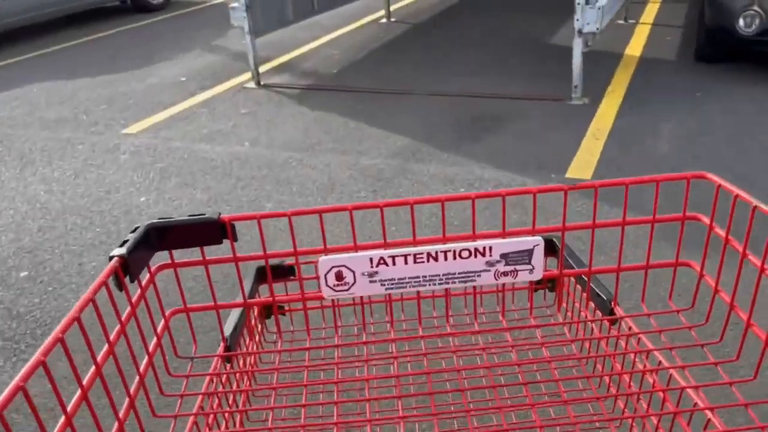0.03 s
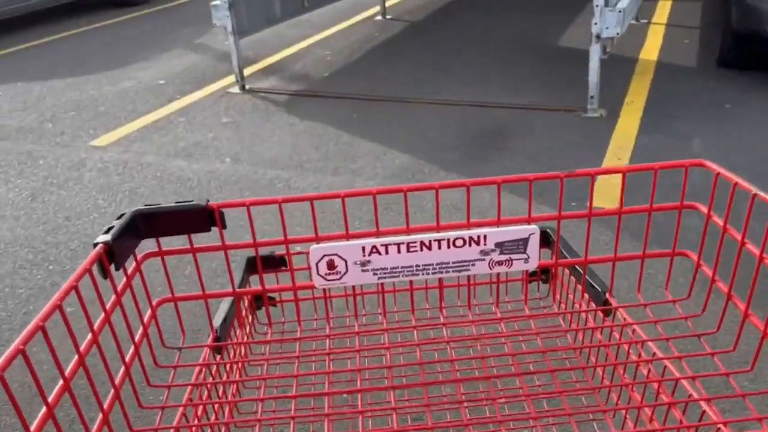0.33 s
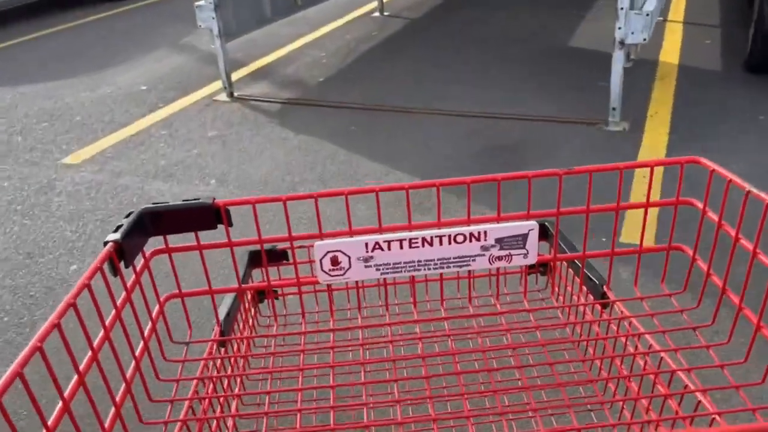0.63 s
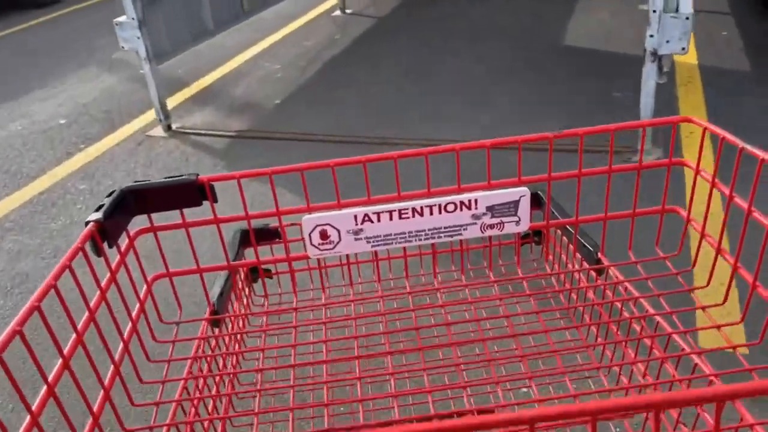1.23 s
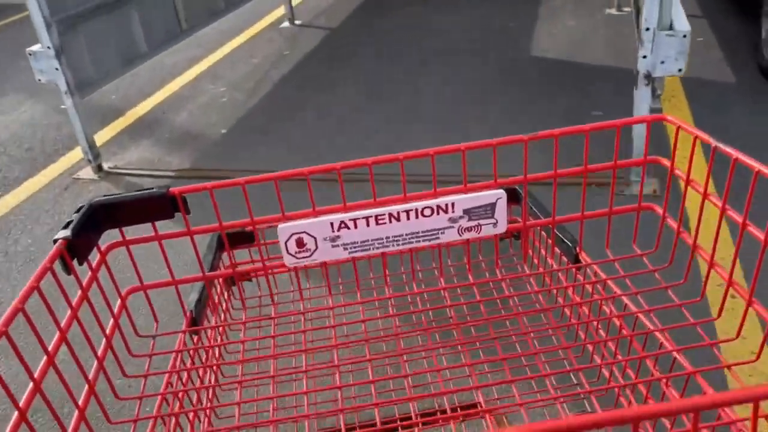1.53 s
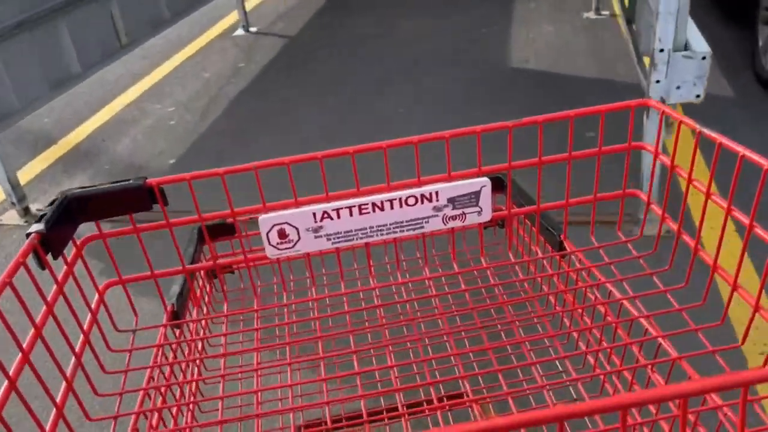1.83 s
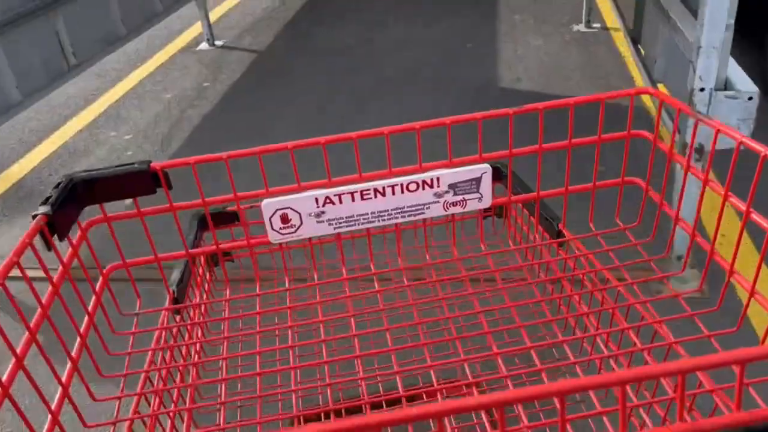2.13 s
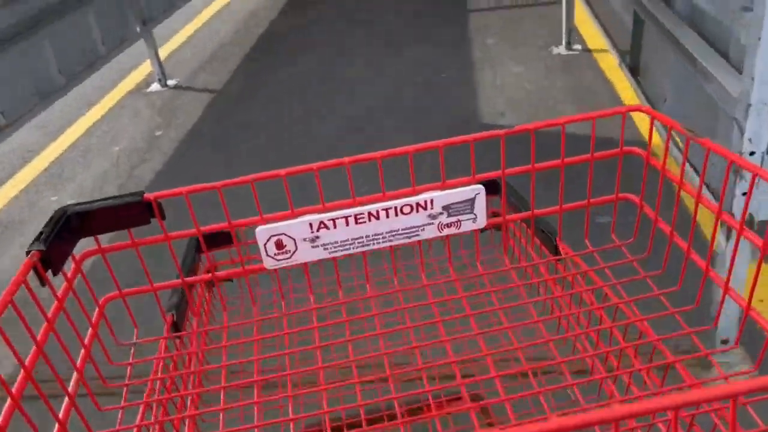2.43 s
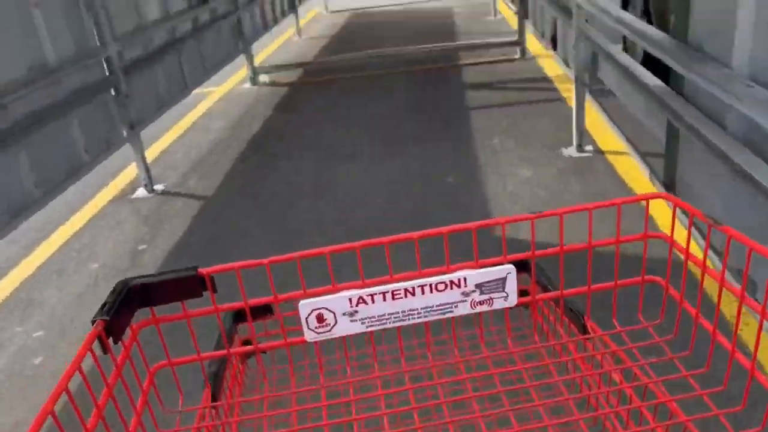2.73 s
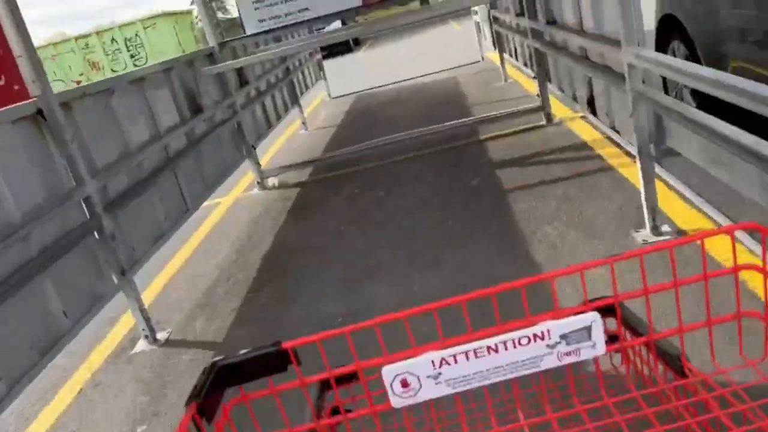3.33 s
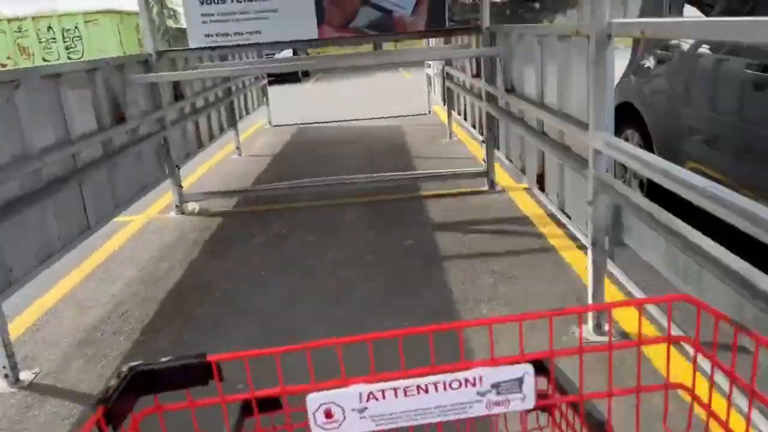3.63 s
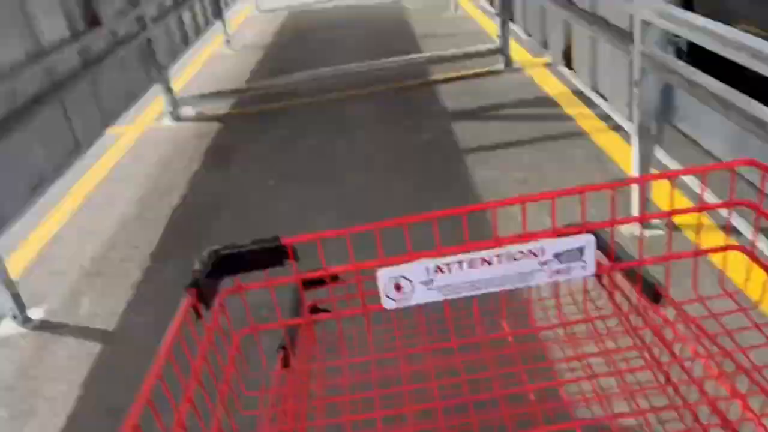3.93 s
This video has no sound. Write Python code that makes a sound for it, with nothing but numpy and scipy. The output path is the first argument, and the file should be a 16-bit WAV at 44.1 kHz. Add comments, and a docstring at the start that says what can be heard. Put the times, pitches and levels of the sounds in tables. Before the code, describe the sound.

A wire shopping cart rattles over rough asphalt, heard from its handle. Throughout, the wheels crunch and rumble, loose casters clack and the basket chatters, with a sharper jingle around 1.2 seconds. A stronger thud comes at 2.3 seconds. From about 2.8 to 3.2 seconds the basket clatters loudly into a corral, its wires ringing. It eases briefly, then clatters again from 3.6 to 4 seconds.

```python
"""A wire shopping cart rattles over rough asphalt and into a cart corral, heard from its handle.
Grit crackles under the wheels, bumps thud through the frame and loose casters clack in their forks.
Each jolt sets the basket chattering with tiny impacts, each ringing the metal for a moment.
At the corral the basket clatters loudly and its wires ring on."""
import sys
import numpy as np
from scipy import signal
from scipy.fft import rfft, irfft
from scipy.io import wavfile

SR = 44100
rng = np.random.default_rng(int(sys.argv[2]) if len(sys.argv) > 2 else 0)


def to_wav(s):
    """Save 16-bit WAV."""
    ch = np.atleast_2d(s).T  # columns
    pcm = np.round(np.clip(ch, -1, 1) * 32767)  # PCM
    wavfile.write(sys.argv[1], SR, pcm.astype(np.int16))


N = 176400
TIME, FREQS = np.arange(N) / SR, np.fft.rfftfreq(N, 1 / SR)
QUADRATURE = np.array([[0], [np.pi / 2]])  # two channels, a quarter cycle apart


def amp(db):
    """Decibels to gain."""
    return 10 ** (np.asarray(db) / 20)

def unit(x):
    """Scales to rms 1."""
    return x / np.sqrt(np.mean(x ** 2) + 1e-20)

def decay(t, t60):
    """An envelope that falls 60 dB in t60 seconds."""
    return np.exp(-np.log(1000) * t / t60)

def read(points, hz):
    """Reads a curve on a log-frequency axis."""
    freqs, values = np.transpose(points)
    return np.interp(np.log(hz + 1), np.log(freqs + 1), values)

def fader(points):
    """A dB curve as gain over time."""
    return amp(np.interp(TIME, *np.transpose(points)))

def add(mix, start_s, sound):
    """Mixes a stereo sound in at start_s."""
    part = mix[:, max(round(start_s * SR), 0):][:, :sound.shape[1]]
    part += sound[:, :part.shape[1]]

def colour(x, eq, size=8192):
    """Minimum-phase EQ: nothing rings ahead of an attack."""
    log_gain = np.log(amp(read(eq, abs(np.fft.fftfreq(size, 1 / SR)))))
    response = np.exp(np.conj(signal.hilbert(log_gain)))
    taps = np.fft.ifft(response).real[:size // 2]
    return signal.fftconvolve(x, taps[None], axes=1)[:, :x.shape[1]]

def ring(t60, tail_db=-17.5, tail_t60=0.15, size=8192):
    """Dense metal modes after one contact: a quick decay, then the frame's faint tail."""
    t = TIME[:size]
    return rng.standard_normal((2, size)) * (decay(t, t60) + amp(tail_db) * decay(t, tail_t60))

def contacts(per_s, spread_db):
    """Random tiny impacts of uneven strength."""
    strength = amp(spread_db * np.minimum(rng.exponential(1, N), 4))
    return unit(strength * rng.choice([-1, 1], N) * (rng.random(N) < per_s / SR))

def excite(force, response):
    """Plays impacts through a resonance scaled to unit energy."""
    response = response / np.linalg.norm(response, axis=1, keepdims=True)
    return signal.oaconvolve(force[None], response, axes=1)[:, :N]

def rattle(force, eq, t60, spots=10):
    """Impacts land on several spots of the cart, each with its own ring."""
    spot = rng.integers(0, spots, N)
    return sum(excite(force * (spot == k), colour(ring(t60), eq)) for k in range(spots))


# Fader moves for the grit and the low rumble: time_s, level_db
GRIT_FADER = [(0, -36), (.18, -40.5), (.5, -35.5), (.72, -38.5), (1.0, -38), (1.1, -36), (1.22, -31),
              (1.4, -35), (1.65, -33.5), (1.78, -38.5), (2.05, -34), (2.26, -35.5), (2.38, -39),
              (2.55, -36), (2.72, -38), (3.15, -32.5), (3.42, -37.5), (3.55, -35.5), (3.75, -33),
              (4, -31.5)]
RUMBLE_FADER = [(0, -33), (.17, -40), (.4, -37), (.56, -40.5), (.76, -42), (1.0, -36), (1.22, -38),
                (1.35, -50.5), (1.62, -31.5), (1.76, -40.5), (2.05, -51), (2.25, -42.5), (2.65, -36.5),
                (3.0, -39), (3.1, -48), (3.35, -43), (3.5, -52), (3.75, -47), (4, -50)]
# Crunchy mids of the grit, bass weight of the rumble: freq_hz, gain_db
GRIT_EQ = [(60, -3), (200, -18.5), (340, -5), (470, 2.5), (590, -3), (760, 5), (1100, 1), (1700, -5),
           (2700, -6.5), (4700, -11), (6500, -15), (7600, -13.5), (10000, -19.5), (14500, -27.5)]
RUMBLE_EQ = [(18, -66), (32, -8.5), (55, 4.5), (75, -0.5), (110, 1), (170, -4.5), (280, -8), (450, -14),
             (900, -33.5), (8000, -51)]
def wheels():
    """The rolling bed: hard wheels crunch over grit and rumble on coarse asphalt."""
    grit = rattle(contacts(per_s=1300, spread_db=2.5) * fader(GRIT_FADER), GRIT_EQ, t60=0.025)
    rumble = rattle(contacts(per_s=320, spread_db=2) * fader(RUMBLE_FADER), RUMBLE_EQ, t60=0.035)
    return grit + rumble

# Thuds under the wheels: start_s, level_db, pitch_hz
BUMP_HITS = [(0.047, -29, 66.4), (0.337, -27.5, 152), (.37, -32.5, 128), (.432, -30.5, 61),
             (0.448, -32, 70.4), (0.694, -29.5, 80), (.808, -26, 60.5), (0.821, -30, 168),
             (1.005, -26, 242), (1.158, -24, 149), (1.576, -25.5, 188), (1.615, -31.5, 132),
             (1.69, -30, 174), (1.91, -29, 95), (1.929, -30.5, 194), (2.275, -16.5, 257),
             (2.292, -24.5, 272), (2.304, -31, 110), (2.477, -24, 99), (2.592, -31.5, 96.5),
             (2.68, -29.5, 106), (2.703, -27.5, 165), (2.781, -29.5, 171), (2.842, -28, 89),
             (2.996, -31, 172), (3.331, -34, 79), (3.69, -36.5, 151)]
def bumps(rise_cycles=0.49, roughness=0.73, size=8192):
    """Each bump rocks the frame for a few cycles, with a scuff of low noise."""
    out, t = np.zeros((2, N)), TIME[:size]
    for start_s, level_db, pitch_hz in BUMP_HITS:
        swell = t * pitch_hz / rise_cycles
        envelope = swell * np.exp(1 - swell)
        sway = np.sin(2 * np.pi * pitch_hz * t + QUADRATURE)
        scuff = unit(colour(rng.standard_normal((2, size)), RUMBLE_EQ))
        add(out, start_s, amp(level_db) * envelope * (sway + roughness * scuff))
    return out

# Tiny ticks of grit and wire ends, and hard snaps of wire on wire: start_s, attack_db
TICK_HITS = [(.549, -35), (1.173, -33.5), (1.597, -45), (3.117, -27), (3.519, -42), (3.568, -42)]
SNAP_HITS = [(1.173, -31.5), (3.568, -32), (3.630, -27)]
# Bright top of a tick, midrange crack of a snap: freq_hz, gain_db
TICK_EQ = [(1000, -28), (6000, 5), (15000, -9)]
SNAP_EQ = [(150, -13), (600, 9), (1000, 10), (2200, 3), (5000, -6), (7500, -9), (11000, -17), (15000, -21)]
def clicks(hits, eq, t60, attack_samples=256):
    """Single hard contacts, each a short burst of ringing metal."""
    out = np.zeros((2, N))
    for start_s, attack_db in hits:
        click = colour(ring(t60), eq)
        add(out, start_s, amp(attack_db) * click / click[:, :attack_samples].std())
    return out

# Clacks of the casters: start_s, level_db (before trim_db), pitch_hz of the hollow note
CLACK_HITS = [(0.224, -32.5, 760), (.535, -32, 795), (1.128, -30, 1100), (1.175, -25.5, 807),
              (1.204, -23, 520), (1.273, -22, 800), (1.326, -26.5, 1440), (1.447, -25.5, 650),
              (1.528, -32, 467), (1.547, -32, 1240), (1.618, -31, 435), (1.652, -29.5, 430),
              (1.841, -26, 764), (1.931, -24, 720), (1.979, -28, 888), (2.03, -29, 1165),
              (2.088, -20.5, 785), (2.126, -21.5, 710), (2.177, -26, 846), (2.236, -25, 431),
              (2.822, -20, 704), (2.837, -18, 1120), (2.864, -21, 437), (2.916, -15, 476),
              (2.958, -18, 644), (3.008, -24, 447), (3.058, -22.5, 674), (3.071, -24, 403),
              (3.084, -20.5, 760), (3.687, -19.5, 717), (3.731, -19, 960), (3.76, -23.5, 474),
              (3.819, -24.5, 447), (3.866, -18.5, 614), (3.934, -23, 895)]
# Boxy body of the knock: freq_hz, gain_db
CLACK_EQ = [(80, -35.5), (250, -11), (450, 3.5), (590, -4), (760, 0), (930, 2), (1350, -3), (1800, -12),
            (4000, -16), (7000, -27), (15000, -40)]
def casters(trim_db=-11, note_db=-2, rise_s=0.0034, attack_samples=1024):
    """Loose casters knock in their forks; each knock brings out one hollow note of the frame."""
    out = np.zeros((2, N))
    for start_s, level_db, pitch_hz in CLACK_HITS:
        metal = ring(t60=0.037)
        t = TIME[:metal.shape[1]]
        rise = np.minimum(t / rise_s, 1)
        knock = colour(metal * rise, CLACK_EQ)
        knock /= knock[:, :attack_samples].std()
        note = rise * decay(t, t60=0.05) * np.sin(2 * np.pi * pitch_hz * t + QUADRATURE)
        note /= note[:, :attack_samples].std()
        add(out, start_s, amp(level_db + trim_db) * (knock + amp(note_db) * note))
    return out

# Shimmer of the basket wires: pitch_hz, relative_db, t60_s
WIRE_MODES = [(5870, -7, 0.73), (7450, -7, 0.33), (9180, -5, 1.3), (9388, -6.5, 1.8), (10100, -5, 0.56),
              (11030, -7, .3), (11125, -7, 1.3), (13550, -10, 0.77)]
def wires(power, trim_db=-1.5, spread_hz=26, knee_db=-30):
    """Groups of like wires store the energy of hard shaking and ring it out, beating together."""
    out = np.zeros((2, N))
    drive = power * (power / (power + amp(knee_db) ** 2)) ** 2  # hardly any ring below the knee
    for pitch_hz, relative_db, t60 in WIRE_MODES:
        feedback = decay(1 / SR, t60) ** 2  # share of energy left after one sample
        stored = signal.lfilter([1 - feedback], [1, -feedback], drive)
        band = 1 / (1 + (2 * (FREQS - pitch_hz) / spread_hz) ** 2)
        shimmer = irfft(rfft(rng.standard_normal((2, N))) * band, N)
        out += amp(relative_db + trim_db) * np.sqrt(stored) * unit(shimmer)
    return out

# Broad clank of the frame: freq_hz, gain_db
CLANK_EQ = [(60, -61), (200, -12), (330, -5), (460, 0), (580, -6.5), (800, 1), (950, -1.5), (1400, -0.5),
            (1900, -6), (2700, -4), (3800, -4.5), (6000, -9.5), (7600, -13), (9500, -27), (15000, -70)]
def loose_parts(force, parts=14, hold_s=0.008, colour_db=1.6, bands=36):
    """One loose part chatters for a moment, then another, each with its own resonances."""
    out = np.zeros((2, N))
    active = rng.integers(0, parts, N)[(TIME / hold_s).astype(int)]
    band_hz = np.geomspace(200, 15000, bands)
    for k in range(parts):
        part_eq = np.transpose([band_hz, colour_db * rng.standard_normal(bands)])
        part_ring = colour(ring(t60=0.04), part_eq)
        out += excite(force * (active == k), colour(part_ring, CLANK_EQ))
    return out

# Jolts that shake the basket: start_s, clank_db, jingle_db, t60_s
BASKET_JOLTS = [(0.0, -34, -41, 0.62), (0.047, -30, -39, 0.6), (.21, -34.5, -60, 0.22),
                (.44, -51, -46, 0.47), (0.474, -35.5, -41, 0.17), (.548, -36, -39.5, 0.35),
                (0.601, -32.5, -41, 0.22), (0.759, -41, -47.5, 1), (.83, -38.5, -46, 0.34),
                (.92, -40, -45, 0.45), (1.124, -36.5, -47, 0.27), (1.172, -32.5, -43, 0.23),
                (1.231, -29, -30, 0.35), (1.269, -29, -35, 0.24), (1.49, -41, -44, 0.26),
                (1.55, -35, -44, 0.24), (1.585, -37, -35, 0.21), (1.789, -38, -44, 0.26),
                (1.976, -27.5, -37, 0.11), (2.026, -33, -38.5, 0.31), (2.088, -48, -39.5, 0.34),
                (2.177, -35.5, -40.5, 0.21), (2.757, -36.5, -37, 0.49), (2.782, -26, -32, 1),
                (2.823, -33, -31.5, 0.79), (2.86, -25.5, -28.5, 0.89), (2.949, -24, -31, 0.96),
                (2.994, -32.5, -29.5, 0.73), (3.089, -28.5, -30, 0.85), (3.24, -39, -51, 0.23),
                (3.567, -37.5, -39, 0.24), (3.628, -33, -45, 0.47), (3.678, -33, -32, .4),
                (3.695, -29.5, -28, 0.94), (3.716, -26.5, -38, 0.44), (3.837, -25, -26.5, 0.91),
                (3.888, -25, -28, 0.46), (3.92, -43, -35, 0.39), (3.994, -33, -42, .3)]
# Sparkle of the jingling wires: freq_hz, gain_db
JINGLE_EQ = [(500, -55), (3000, -2.5), (6000, 1), (7500, 3.5), (8900, 7), (11000, -0.5), (12500, -0.5),
             (14400, -1), (15200, -19)]
def basket(rise_s=0.00053):
    """Jolts start a dying chatter of loose parts, which clanks, jingles and rings the wires."""
    clank_power, jingle_power = np.zeros((2, N))
    for start_s, clank_db, jingle_db, t60 in BASKET_JOLTS:
        age = np.maximum(TIME - start_s, 0)
        shake = np.minimum(age / rise_s, 1) * decay(age, t60)
        clank_power += (amp(clank_db) * shake) ** 2
        jingle_power += (amp(jingle_db) * shake) ** 2
    on_frame = contacts(per_s=900, spread_db=1) * np.sqrt(clank_power)
    on_wires = contacts(per_s=600, spread_db=1) * np.sqrt(jingle_power)
    return loose_parts(on_frame) + rattle(on_wires, JINGLE_EQ, t60=0.04) + wires(jingle_power)

# How alike left and right sound: freq_hz, coherence (0-1)
STEREO_COHERENCE = [(30, .85), (120, .68), (260, .85), (500, .82), (750, .3), (1550, .2), (1750, .68),
                    (4500, .6), (5400, .45), (6200, .72), (7400, .93), (7900, 1), (8750, 1), (9200, .93),
                    (10500, .8), (12000, .97), (13500, .72), (15000, .85)]
# Phase between the sides: freq_hz, left_lead_rad
STEREO_PHASE = [(30, 0), (200, -.15), (600, -.55), (1200, .2), (1800, .4), (3000, 1.1), (4800, .6),
                (5500, -.9), (6600, -1.3), (7850, -3.14), (8750, -3.14), (11300, -6.2), (12900, -6.5),
                (13200, -7.4), (15000, -9.3)]
# Pan across the spectrum: freq_hz, left_minus_right_db
STEREO_PAN = [(250, 0), (700, -2), (1600, -2), (1800, -1), (3200, 3.5), (4800, 5), (6500, 1), (7800, 0)]
def stereo_image(cart):
    """The cart reaches two spaced microphones, with width, phase and pan varying by frequency."""
    left, independent = rfft(cart)
    coherence = np.clip(read(STEREO_COHERENCE, FREQS), 0, 1)
    right = coherence * left + np.sqrt(1 - coherence ** 2) * independent
    right *= np.exp(-1j * read(STEREO_PHASE, FREQS))
    lean = amp(read(STEREO_PAN, FREQS) / 2)
    return irfft(np.array([left * lean, right / lean]), N)

def scene():
    """The rolling bed under the clattering cart, with snaps and ticks as accents."""
    cart = wheels() + bumps() + casters() + basket()
    snaps = clicks(SNAP_HITS, SNAP_EQ, t60=0.045)
    ticks = clicks(TICK_HITS, TICK_EQ, t60=0.016)
    return stereo_image(cart + snaps + ticks)

def record(dry, low_cut_hz=41, high_cut_hz=14650, brickwall_hz=15725):
    """Rolls off the deepest bass and cuts the top treble steeply."""
    low_cut = signal.butter(3, low_cut_hz, "highpass", fs=SR, output="sos")
    high_cut = signal.cheby1(12, 0.2, high_cut_hz, fs=SR, output="sos")
    brickwall = signal.firwin(511, brickwall_hz, window=("kaiser", 9), fs=SR)
    filtered = signal.sosfilt(np.vstack([low_cut, high_cut]), dry)
    return signal.oaconvolve(filtered, brickwall[None], "same")


dry = scene()
out = record(dry)
to_wav(out)
```